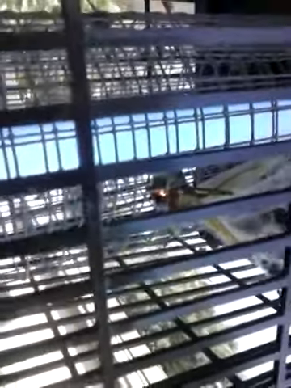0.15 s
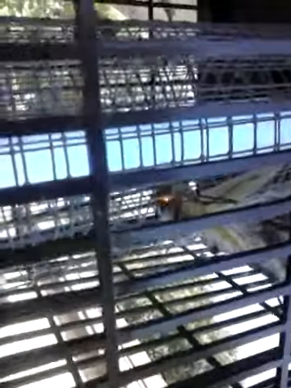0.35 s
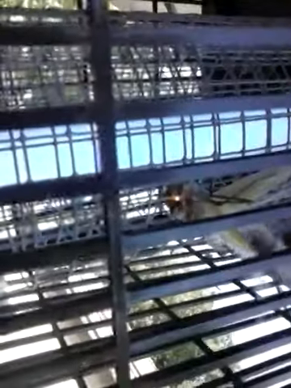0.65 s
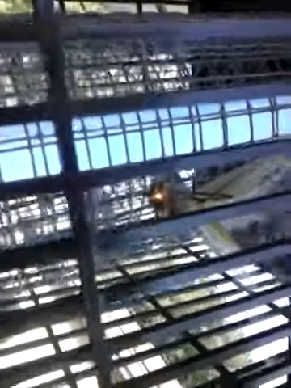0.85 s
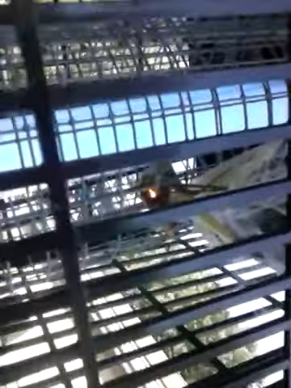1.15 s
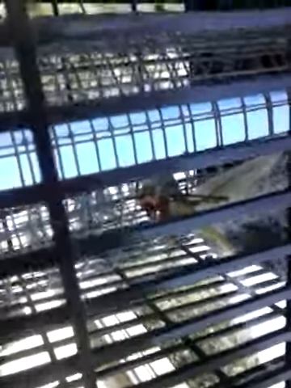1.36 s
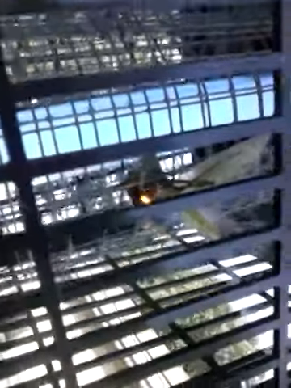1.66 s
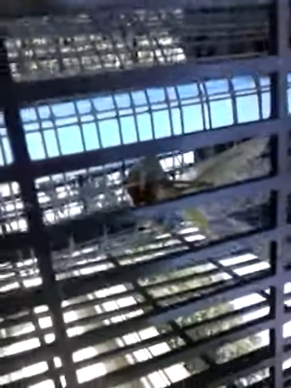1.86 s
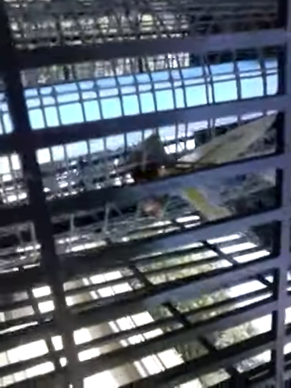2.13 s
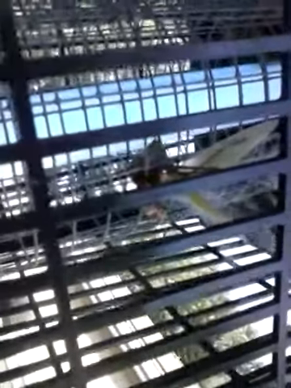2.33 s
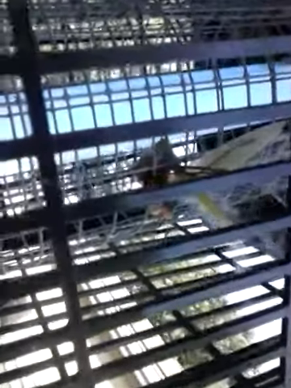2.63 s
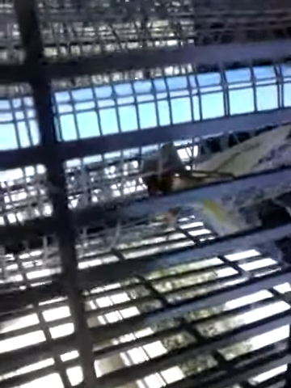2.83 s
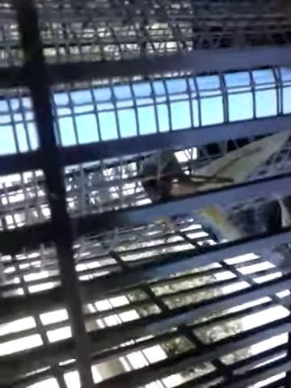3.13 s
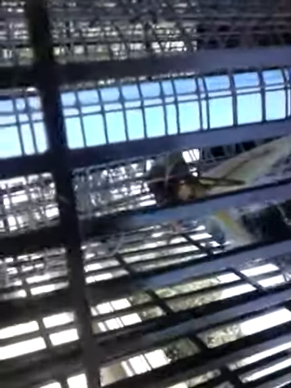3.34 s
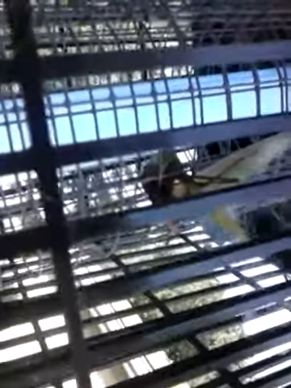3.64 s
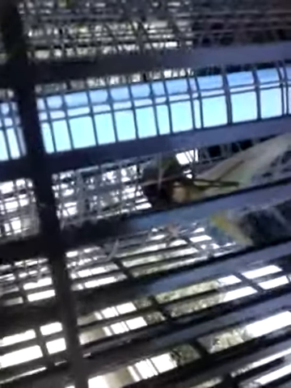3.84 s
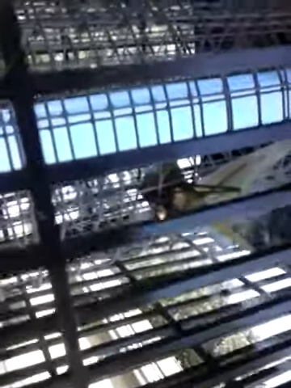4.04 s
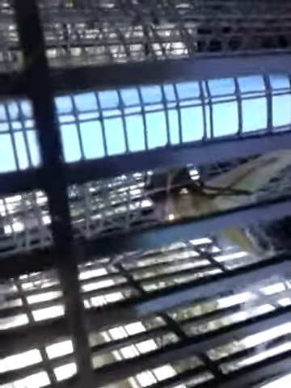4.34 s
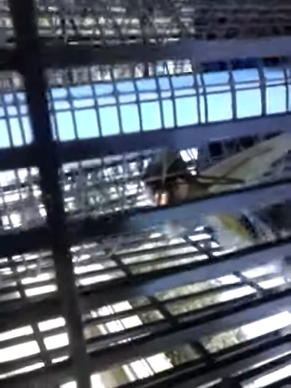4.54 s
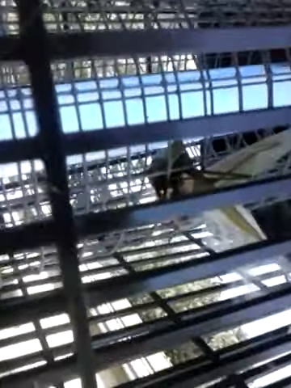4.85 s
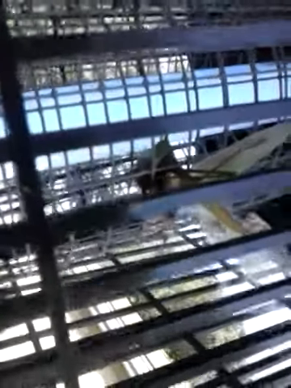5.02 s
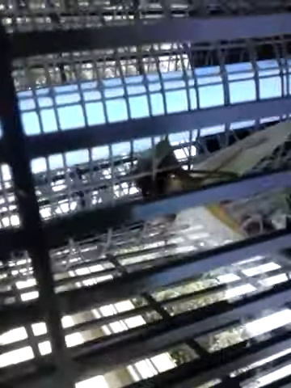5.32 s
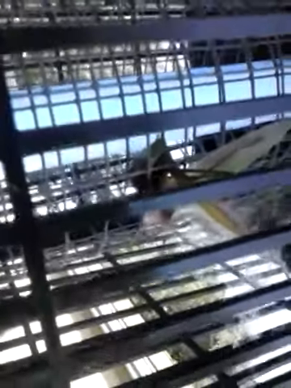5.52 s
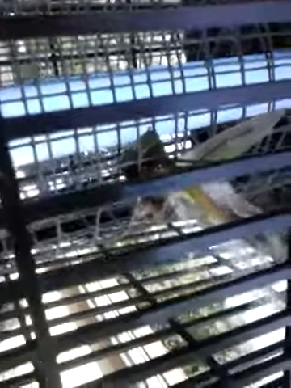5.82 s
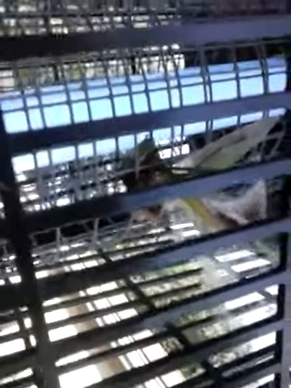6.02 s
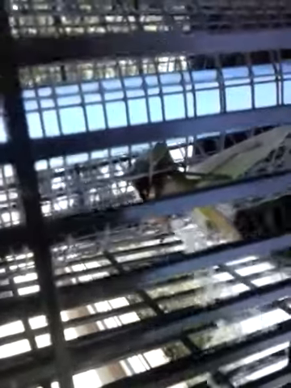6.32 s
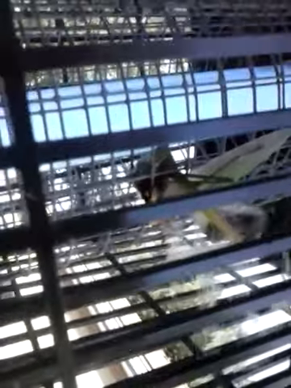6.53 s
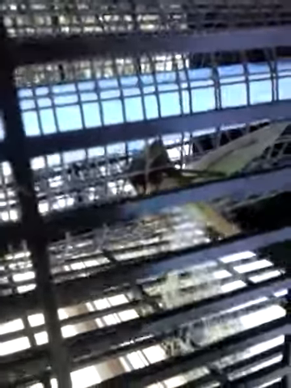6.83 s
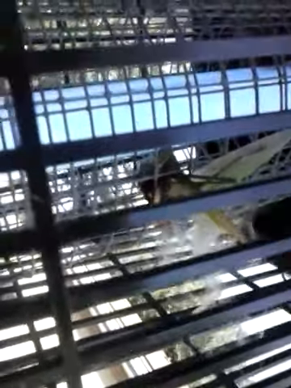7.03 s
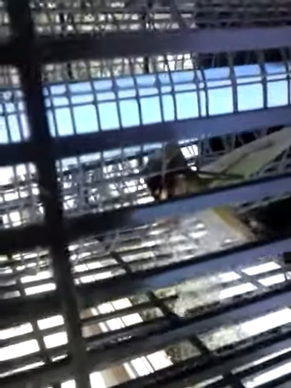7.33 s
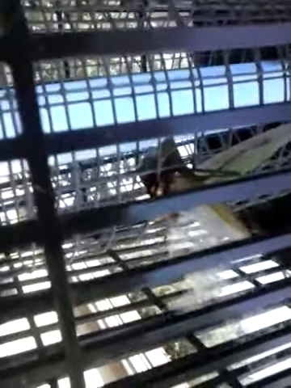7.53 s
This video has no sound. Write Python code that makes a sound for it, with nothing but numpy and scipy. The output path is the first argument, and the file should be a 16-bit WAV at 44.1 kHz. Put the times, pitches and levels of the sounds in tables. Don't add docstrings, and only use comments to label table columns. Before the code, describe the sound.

Very close to the microphone, an insect burns on an electric grid: a rapid, gritty 120-per-second buzz of snaps with wet sizzling. It dips, then surges harsh and loud with uneven spits and dull cage knocks, stutters, and suddenly lets go. High crickets, a throbbing far chorus and soft air remain, broken by faint hisses and a few sharper crackling bursts. Short echoes come from nearby walls.

```python
import sys
import numpy as np
from scipy import signal
from scipy.fft import rfft, irfft
from scipy.io import wavfile
from scipy.ndimage import uniform_filter1d

SR = 44100
rng = np.random.default_rng(int(sys.argv[2]) if len(sys.argv) > 2 else 0)


def int16_out(signal):
    q = np.round(np.clip(np.atleast_2d(signal).T, -1, 1) * 32767)
    wavfile.write(sys.argv[1], SR, q.astype(np.int16))


def ratio_of_db(decibels):
    return 10 ** (np.asarray(decibels, float) / 20)


N = 338247
MAINS_HZ = 60


def evened(x):
    return x / np.sqrt(np.mean(x ** 2) + 1e-20)


def read(points, hz):
    f, value = np.transpose(points)
    return np.interp(np.log(hz + 1), np.log(f + 1), value)


def resonate(x, hz, width):
    turn = np.exp(2j * np.pi * hz * np.arange(len(x)) / SR)
    r = np.exp(-np.pi * width / SR)
    return 2 * (turn * signal.lfilter([1 - r], [1, -r], x / turn)).real


def noise_band(hz, width):
    return evened(resonate(resonate(rng.standard_normal(N), hz, width), hz, width))


def lumps(width):
    smooth = uniform_filter1d(rng.standard_normal(N), int(width))
    return evened(uniform_filter1d(smooth, int(width)))


def held(t, rows, column, otherwise):
    rows = np.array(rows)
    k = np.maximum(np.searchsorted(rows[:, 0], t) - 1, 0)
    inside = (t >= rows[k, 0]) & (t < rows[k, 0] + rows[k, 1])
    return np.where(inside, rows[k, column], otherwise)


def cage_filtered(x, tilt_db=0, bow_db=0):
    # frequency in Hz, level in dB per Hz.
    spark = [(380, -39), (650, -31.5), (1660, -9.5), (2240, -4), (3280, -2), (7630, -0.5), (9110, -6),
             (15100, -10.5), (15700, -9), (16800, -36)]
    # frequency in Hz, width in Hz, depth in dB.
    notches = [(2180, 300, 12), (2480, 420, 16), (3830, 250, 12.5), (4700, 250, 5), (5600, 450, 8),
               (6900, 200, 3), (8650, 300, 8), (10250, 400, 8), (11300, 450, 17), (13000, 400, 9),
               (14250, 500, 18)]
    hz = np.fft.rfftfreq(2048, 1 / SR)
    octaves = np.log2((hz + 50) / 7000)
    db = read(spark, hz) + tilt_db * octaves - bow_db * np.minimum(octaves ** 2, 3)
    db -= sum(depth / (1 + (2 * (hz - f) / w) ** 2) for f, w, depth in notches)
    log_gain = np.log(ratio_of_db(np.maximum(db, -70)))
    full = signal.hilbert(np.r_[log_gain, log_gain[-2:0:-1]]).conj()
    taps = -np.fft.ifft(np.exp(full)).real[:600]
    return signal.oaconvolve(x, taps / np.linalg.norm(taps))[:N]


def half_cycles():
    # time in seconds, snap in dB, extra of the negative half in dB.
    contact = [(0, -16.5, 3), (.3, -17, 3.5), (.48, -23, -2.5), (.7, -24, 2), (1, -21, 5.5),
               (1.33, -16.5, 0.5), (1.4, -16, 5), (1.6, -9.5, 1.5), (2.15, -13, 3), (2.6, -11, 2.5),
               (2.95, -9, 1), (3.25, -17, 0), (3.779, -7, 0), (4.46, -9, 0), (4.52, -17.5, -10),
               (4.681, -26.5, 0), (4.72, -42, 3), (7.67, -42, -7)]
    # start in seconds, length in seconds, positive snap in dB, negative snap in dB.
    shifts = [(2.977, .22, -34, -14.5), (3.206, .13, -17.5, -17.5), (3.8, .085, -14.5, -16.5),
              (3.884, .05, -12.5, -13), (4.05, .161, -33, -21), (5.78, .05, -38, -25.5),
              (5.833, 0.062, -24.5, -46), (6.423, 0.099, -28.5, -40), (6.6, 0.12, -31, -43),
              (6.739, 0.052, -20.5, -30), (6.8, .13, -16, -20), (6.93, 0.21, -25, -35),
              (7.1, .085, -17.5, -23.5), (7.19, .07, -50, -46), (7.259, 0.18, -27, -22),
              (7.412, 0.074, -27, -42), (7.509, .09, -30, -33.5), (7.597, .07, -28.5, -61)]
    # start in seconds, length in seconds,
    # positive sizzle in dB, negative sizzle in dB, growth in dB per 2 ms.
    boils = [(-.1, 0.43, -37, -43, 3), (0.214, 0.16, -37, -42, 5), (0.375, 0.07, -43, -48, 4),
             (0.448, .6, -51.5, -75, 0), (1.063, .14, -47, -50, 0), (1.214, 0.098, -33, -41, 0),
             (1.346, 0.12, -26.5, -25, -0.5), (1.466, 0.06, -26.5, -40, -1), (1.6, 0.077, -43, -46, -13),
             (1.738, 0.16, -36, -42, 1.5), (1.93, .07, -43.5, -47, -8), (1.975, 0.095, -37, -39, -13),
             (2.1, 0.36, -39, -50, -5), (2.47, 0.28, -38.5, -39.5, -13), (2.66, .27, -57, -55, -17),
             (3.487, 0.37, -45, -60, -13), (3.9, .15, -38, -46, -2), (4.3, 0.24, -45, -47, -7),
             (5.35, 0.26, -56, -80, 5), (5.762, .19, -47.5, -71, 1), (6.05, .16, -51, -73, 3.5),
             (6.418, 0.21, -47.5, -95, 4), (6.731, .35, -51.5, -83, 1), (7.203, .23, -42, -58, 3.5),
             (7.45, 0.23, -56, -82, -0.5)]
    # time in seconds, snap
    # in dB.
    misses = [(.4459, -28), (.4951, -41), (.6454, -31), (.6786, -31), (1.5292, -27), (1.5379, -25),
              (6.8625, -32), (2.9375, -44), (2.9458, -20), (3.104, -34), (3.1202, -31), (3.1625, -31),
              (3.1708, -37), (3.3037, -36.5), (3.6958, -22), (3.8125, -33), (3.8375, -40), (4.0625, -28),
              (4.0958, -24), (4.1958, -17), (3.8792, -36), (4.2292, -25), (4.2383, -44), (4.2875, -41),
              (4.3125, -19), (4.3206, -30), (3.8208, -30), (4.5292, -25), (4.6125, -48), (4.6625, -28),
              (4.1042, -19), (4.1792, -12), (3.1458, -22), (3.2875, -25), (3.8542, -23), (4.0458, -14)]
    # time in seconds, snap in dB, sizzle in dB.
    flares = [(2.6458, -5, -34), (1.5792, -3, -32), (1.8704, -11, -29), (1.9466, -7, -21.5),
              (1.9792, -6, -22.5), (3.0871, -11, -57), (3.137, -17, -59), (3.1536, -20, -64),
              (2.5958, -8, -25.5), (4.1204, -23, -70), (4.2208, -4.5, -44), (1.6125, -6.5, -33),
              (4.4542, -2.5, -31), (4.4875, -12.5, -31.5), (4.6213, -19, -29.5), (4.6376, -22, -30),
              (2.8458, -5, -36), (4.6793, -20, -72), (4.6871, -19, -66), (4.7371, -27, -46),
              (2.7958, -6, -36), (6.7208, -27.5, -41), (6.1545, -50, -40), (6.505, -28, -35.5),
              (6.605, -40, -44), (1.6958, -8.5, -28), (2.6792, -5, -40), (2.7292, -5, -42),
              (2.8125, -6, -42), (1.5625, -4, -38), (1.5708, -5, -42), (1.6375, -5, -40),
              (1.3375, -12, -38), (4.2958, -9, -41), (3.3125, -12, -45), (6.8292, -17, -44),
              (6.9208, -15, -44), (6.9875, -33, -42), (7.1042, -12, -39), (7.1208, -21, -30.5),
              (7.1375, -22, -32)]
    # time in seconds, sizzle in dB.
    spurts = [(1.8042, -31), (1.8542, -27), (1.9958, -21.5), (2.0125, -22), (2.0292, -23), (2.0375, -31),
              (2.0542, -28.5), (2.0708, -29), (2.0875, -30), (2.3208, -31), (2.3375, -39), (2.3542, -30.5),
              (2.3708, -27.5), (2.4208, -27), (2.4542, -36), (2.5375, -29), (2.5542, -28), (2.5875, -27),
              (2.6042, -32), (2.6208, -28.5), (3.5042, -25), (3.5708, -26.5), (3.5875, -27),
              (3.6042, -28.5), (3.6375, -29), (3.6542, -29), (3.6708, -29), (3.7708, -27), (3.7875, -30),
              (1.2708, -28), (1.3708, -35), (1.5875, -34), (1.7542, -30), (1.8708, -26), (2.2208, -34),
              (2.2708, -35), (2.2875, -34), (2.4042, -34), (2.4875, -33), (2.5708, -32), (2.8042, -36),
              (2.8208, -36), (2.8542, -34), (2.8875, -33), (2.9042, -32), (3.4375, -39), (3.4542, -38),
              (3.7042, -34), (3.7208, -32), (3.7375, -32), (3.9542, -28), (3.9708, -34), (3.9875, -33),
              (4.0042, -28), (4.0375, -35), (4.4042, -33), (4.4375, -33), (4.4708, -31)]
    # time in seconds, sizzle in dB.
    spits = [(0.0125, -33), (0.0292, -33), (0.1625, -31), (0.1458, -33), (0.2708, -33), (0.3375, -35),
             (0.3542, -36), (0.4375, -38), (0.4042, -40), (0.5375, -40), (0.5708, -46), (5.8542, -42),
             (5.9042, -47), (5.9375, -47), (6.0708, -45), (6.1375, -38), (6.6375, -45), (6.7542, -40),
             (6.7708, -44), (6.8208, -36), (6.8375, -35), (6.8542, -31), (6.8708, -33), (6.8875, -33),
             (6.9042, -31.5), (7.1542, -42), (7.1708, -35), (7.1875, -35), (7.4042, -34), (7.4208, -34),
             (7.4542, -44), (7.4708, -42), (7.5208, -46), (7.5708, -46.5), (7.5875, -48)]
    dry_db, steam_db = -42, -69
    build_db, build_share = 4, .25
    fitful_db = 2.5

    def which(rows):
        return np.round(2 * MAINS_HZ * np.array(rows)[:, 0] - .5).astype(int)

    count = int(2 * MAINS_HZ * N / SR) - 1
    cycle, negative = np.divmod(np.arange(count), 2)
    t = (cycle + .25 + negative / 2) / MAINS_HZ
    early, hard, wet = rng.standard_normal((count, 3)).T

    s, firm_db, extra_db = np.transpose(contact)
    usual_db = np.interp(t, s, firm_db) + negative * np.interp(t, s, extra_db)
    snap_db = held(t, shifts, 2 + negative, usual_db)

    done = (t - held(t, boils, 0, 0)) / held(t, boils, 1, 1)
    boil_db = held(t, boils, 2 + negative, -99) - build_db * np.maximum(1 - done / build_share, 0)
    quiet_db = np.maximum(snap_db + dry_db, steam_db - 24 * negative)
    sizzle_db = np.maximum(boil_db, quiet_db) + fitful_db * np.clip(wet, -2, 1.5)
    snap_db = snap_db + hard
    growth_db = np.where(negative, -3.0, held(t, boils, 4, .5))

    snap_db[which(misses)] = np.array(misses)[:, 1]
    sizzle_db[which(misses)] = steam_db
    snap_db[which(flares)], sizzle_db[which(flares)] = np.array(flares)[:, 1:].T
    for pockets in (spurts, spits):
        sizzle_db[which(pockets)] = np.array(pockets)[:, 1] - 1.5
    growth_db[which(spurts)] = -3

    share = np.take((.235, .755), negative) + .0022 * (np.clip(snap_db, -26, -8) + 10) + .008 * early
    return (cycle + share) / MAINS_HZ, snap_db, sizzle_db, growth_db


def arc():
    start, snap_db, sizzle_db, growth_db = half_cycles()
    t = np.arange(N) / SR

    damp = np.clip((uniform_filter1d(sizzle_db - snap_db, size=7) + 39) / 14, .25, .9)
    damp = damp * np.resize([1, .3], len(damp))
    snaps, bright = np.zeros(N), np.zeros(N)
    at = np.round(start * SR).astype(int)
    snaps[at] = ratio_of_db(snap_db + 2) * np.sqrt(1 - damp)
    bright[at] = rng.random(len(at))

    k = np.maximum(np.searchsorted(start, t) - 1, 0)
    since = t - start[k]
    left = (k // 2 + .57 + k % 2 * .52) / MAINS_HZ - t
    burning = np.clip(since / .00024, 0, 1) * np.clip(left / .00042, 0, 1)

    kicks = rng.random(N) * (rng.random(N) < 400 / SR)
    fits = signal.lfilter([1], [1, -np.exp(-1 / (.0022 * SR))], kicks)
    steady = np.clip(.55 - .088 * growth_db[k], .05, .95)
    flare = steady + (1 - steady) * 1.22 * uniform_filter1d(np.minimum(fits, .8), size=14)

    level_db = sizzle_db[k] + growth_db[k] * (since - .004) / .002 + 1.5 * lumps(40)
    sizzling = ratio_of_db(np.minimum(level_db + 6.5, sizzle_db[k] + 11.5)) * flare
    smear = ratio_of_db(snap_db[k] - 3.5) * np.sqrt(damp[k]) * np.exp(-abs(since) / .00075)
    restrikes = rng.standard_normal(N) * (rng.random(N) < .4)
    hail = np.hypot(sizzling, smear) * burning * restrikes

    weak = np.clip((-22 - uniform_filter1d(snap_db, size=9)[k]) / 12, 0, 1)
    steam = cage_filtered(hail * np.sqrt(weak), tilt_db=2, bow_db=4.5)
    sizzle = cage_filtered(hail * np.sqrt(1 - weak), tilt_db=.52)
    bright_snaps = cage_filtered(snaps * bright, tilt_db=-.9)
    dull_snaps = cage_filtered(snaps * (1 - bright), tilt_db=-2.5, bow_db=-.8)
    return sizzle + steam + bright_snaps + dull_snaps


def porch(x):
    t = np.arange(SR // 4) / SR
    tail = rng.standard_normal(len(t)) * ratio_of_db(-60 * t / .12) * np.clip(t / .00043, 0, 1)
    return signal.oaconvolve(x, tail / np.linalg.norm(tail))[:N]


def transformer():
    # time in seconds, buzz in dB.
    load = [
        (0, -79),
        (.9, -75),
        (1.55, -69),
        (2.7, -65),
        (4.4, -65),
        (4.76, -83),
        (6.8, -77),
        (7.67, -79.5),
    ]
    t = np.arange(N) / SR
    hum = ratio_of_db(-78 + 1.1 * lumps(2000)) * np.sin(2 * np.pi * (MAINS_HZ * t + rng.random()))
    uneven = .041 * np.cos(2 * np.pi * MAINS_HZ * t)
    turns = 2 * MAINS_HZ * t + .025 * lumps(250) - .45 + uneven
    half = np.floor(turns)
    pulls = np.diff(half, prepend=-1) * (1 + .28 * np.cos(np.pi * half))
    load_db = np.interp(t, *np.transpose(load))
    wobble = ratio_of_db(2.6 * lumps(250))
    body = resonate(pulls * wobble, 270, 160) + 1.03 * resonate(pulls * wobble, 450, 500)
    push = evened(resonate(body, 560, 1400))
    tick = evened(resonate(resonate(pulls * wobble ** 2, 1500, 910), 1340, 1000))
    return hum + ratio_of_db(load_db + 5.5) * push + ratio_of_db(load_db + 6.5) * tick


def chirping(chirps, pause_s, swell_s, hold_s, fade_s):
    first_s, first_db = chirps[0]
    earlier = [(s, first_db - 4) for s in np.arange(first_s - pause_s, -pause_s, -pause_s)]
    t = np.arange(N) / SR
    corners = np.cumsum([0, swell_s, hold_s, fade_s])
    return sum(ratio_of_db(db) * np.interp(t - s, corners, [0, 1, 1, 0]) ** 2 for s, db in earlier + chirps)


def trilling_cricket():
    # start in seconds, level in dB.
    high_chirps = [(4.715, -53), (5.05, -52), (5.485, -51), (5.81, -53), (6.18, -53), (6.56, -53.5),
                   (6.89, -54), (7.26, -55), (7.61, -51)]
    tone_hz, wander_hz, strokes_per_s, warm_up_hz = 4790, 35, 93, 150
    gain = chirping(high_chirps, pause_s=.345, swell_s=.05, hold_s=.115, fade_s=.03)
    strokes = np.cos(np.pi * np.cumsum(strokes_per_s * (1 + .16 * lumps(814))) / SR) ** 2
    warm = np.clip(gain / ratio_of_db(-57), 0, 1)
    pitch = tone_hz + wander_hz * lumps(465) - 90 * strokes - warm_up_hz * (1 - warm)
    tone = (.5 + strokes) * ratio_of_db(2.5 * lumps(170)) * np.sin(2 * np.pi * np.cumsum(pitch) / SR)
    fuzz = noise_band(.94 * tone_hz, 450)
    murmur = ratio_of_db(-72 + 3 * lumps(1500))
    return (gain + murmur) * evened(evened(tone) + .55 * fuzz)


def far_chorus():
    far = ratio_of_db(-68.5 + lumps(1100)) * noise_band(5150, 450)
    under = ratio_of_db(-68 + 3 * lumps(700)) * noise_band(4200, 350)
    return far + under


def air():
    # frequency in Hz, level in dB per Hz.
    air_curve = [(26, -22), (45, 3), (247, -12.5), (287, -10.5), (1090, -14.5), (1740, -9.5), (2400, -20.5),
                 (3800, -7.5), (4570, 1), (5700, -14), (7480, -7.5), (11100, -23), (14900, -14.5),
                 (16500, -59)]
    hz = np.fft.rfftfreq(N, 1 / SR)
    tinted = irfft(rfft(rng.standard_normal(N)) * ratio_of_db(read(air_curve, hz)), N)
    return ratio_of_db(-57.3) * evened(tinted)


def strokes_at(starts, level_db, hz, fall_hz, length):
    out = np.zeros(N + SR)
    u = np.arange(0, length, 1 / SR) / length
    chances = rng.standard_normal((len(starts), 2))
    for s, db, (louder, higher) in zip(starts, level_db, chances):
        pitch = hz + 40 * higher - fall_hz * u ** 4
        tone = np.sin(np.pi * u ** .6) * np.sin(2 * np.pi * np.cumsum(pitch) / SR)
        out[round(s * SR):][:len(u)] += ratio_of_db(db + 2.5 * louder + 6) * tone
    return out[:N]


def chipping_cricket():
    times = np.arange(.094, N / SR, .2465)
    level_db = -53 - np.resize([5., 0], len(times))
    return strokes_at(times, level_db, hz=4680, fall_hz=300, length=.03)


def low_cricket():
    # start in seconds, level in dB.
    low_chirps = [(4.72, -58), (5.22, -56), (5.78, -56), (6.2, -57), (6.63, -56), (7.2, -60)]
    pause_s, stroke_every_s = .495, .051
    first_s, first_db = low_chirps[0]
    earlier = [(s, first_db) for s in np.arange(first_s % pause_s, first_s - .1, pause_s)]
    chirps = np.array(earlier + low_chirps)
    stroke = np.arange(4)
    starts = (chirps[:, :1] + stroke_every_s * stroke).ravel()
    level_db = (chirps[:, 1:] - 2 * abs(stroke - 1.3)).ravel()
    return strokes_at(starts, level_db, hz=4230, fall_hz=500, length=.046)


def jolts():
    # time in seconds, level in dB.
    hard_sparks = [(.947, -50), (1.546, -47), (1.562, -46), (1.571, -44), (1.579, -43), (1.637, -46),
                   (1.654, -48), (1.687, -47), (1.696, -46), (1.704, -47), (1.762, -48), (1.779, -48),
                   (1.862, -47), (1.946, -46)]
    hz, width_hz = 550, 600
    s, db = np.transpose(hard_sparks)
    hits = np.zeros(N)
    hits[np.round(s * SR).astype(int)] = ratio_of_db(db)
    knock = resonate(resonate(hits, hz, width_hz), hz, width_hz)
    return knock * SR / (np.pi * width_hz)


def scene():
    sparks = arc()
    zapper = sparks + ratio_of_db(-15.5) * porch(sparks) + transformer()
    evening = trilling_cricket() + far_chorus() + air() + chipping_cricket() + low_cricket()
    evening = evening - .55 * resonate(evening, 3830, 240)
    mono = zapper + evening + jolts()
    return np.array([mono, mono])


def starved(x):
    hz, t, z = signal.stft(x, SR, nperseg=2048, noverlap=1024, window="cosine")
    power, f = abs(z) ** 2, hz[:, None]
    band = uniform_filter1d(power, size=5, axis=0)
    around = uniform_filter1d(power, size=90, axis=0)
    mood_db = 18 * uniform_filter1d(rng.standard_normal(z.shape), size=16, axis=0)
    masked = around * ratio_of_db(-2 * 14.5) * (f > 1900)
    loud = uniform_filter1d(power.mean(0), size=3) * ratio_of_db(-2 * 21.3) * ((f > 130) & (f < 1000))
    faint = ratio_of_db(-2 * 99) * (f > 9000)
    mask = np.maximum(np.maximum(masked, loud), faint) * ratio_of_db(2 * mood_db)
    frames = np.pad(x, (512, 2048))[:1024 * len(t)].reshape(len(t), 1024)
    snappy = abs(frames).max(1) > 10.5 * frames.std(1)
    kept = (band > mask) & (snappy | (f < 15800))
    return signal.istft(z * kept, SR, nperseg=2048, noverlap=1024, window="cosine")[1][:N]


def band_limit(x):
    return signal.sosfilt(signal.butter(12, 16990, fs=SR, output="sos"), x)


def record(dry):
    # frequency in Hz, level in dB.
    sides = [(60, -3), (300, -2.5), (1300, -2), (4000, 5), (12000, 6)]
    overload = .5
    edge = signal.firwin(255, 16800, window=("kaiser", 5), fs=SR)
    rounded = overload * np.tanh(dry[0] / overload)
    mono = starved(signal.oaconvolve(rounded, edge, "same"))
    tint = ratio_of_db(read(sides, np.fft.rfftfreq(N, 1 / SR)))
    tinted = irfft(rfft(np.roll(mono, 300)) * tint, N)
    grain = ratio_of_db(-22) * tinted * np.maximum(lumps(460) - .3, 0)
    mix = np.array([mono + grain, mono - grain]) + .00183
    return band_limit(mix)


dry = scene()
out = record(dry)
int16_out(out)
```